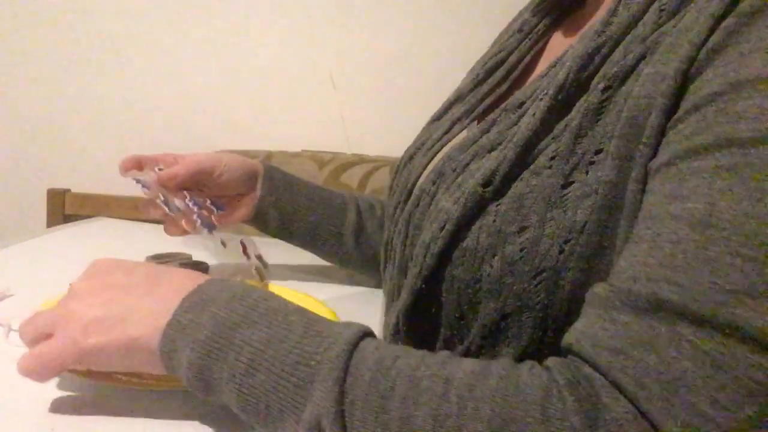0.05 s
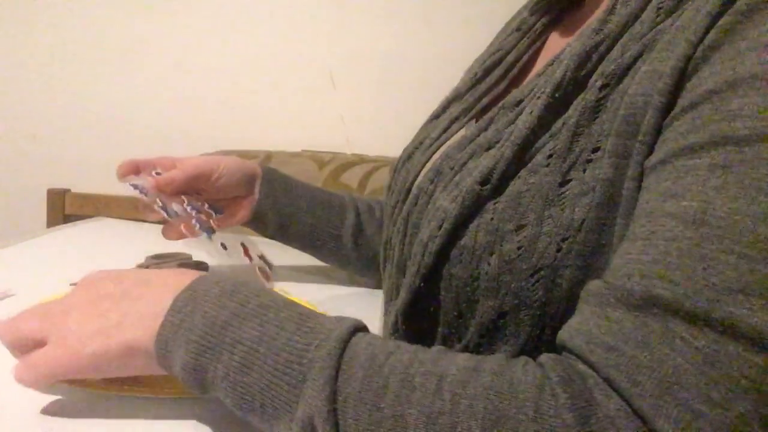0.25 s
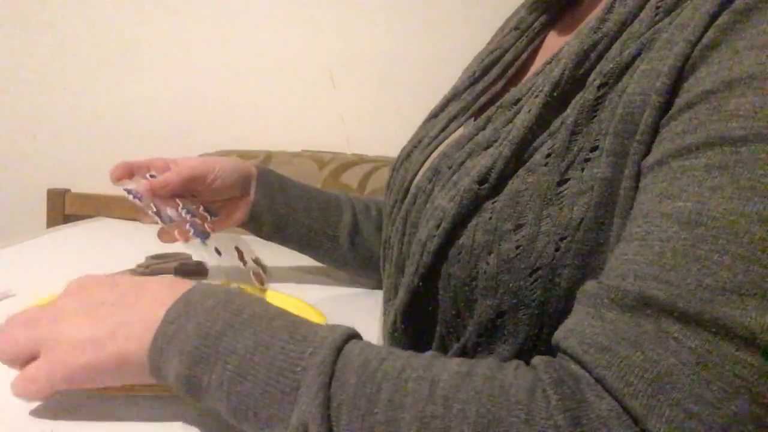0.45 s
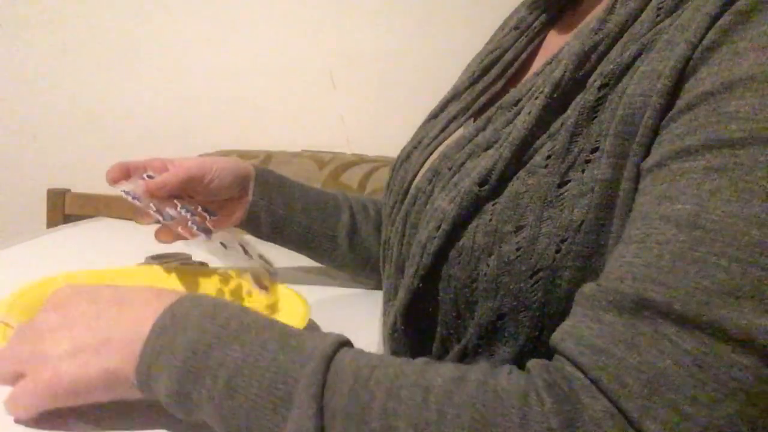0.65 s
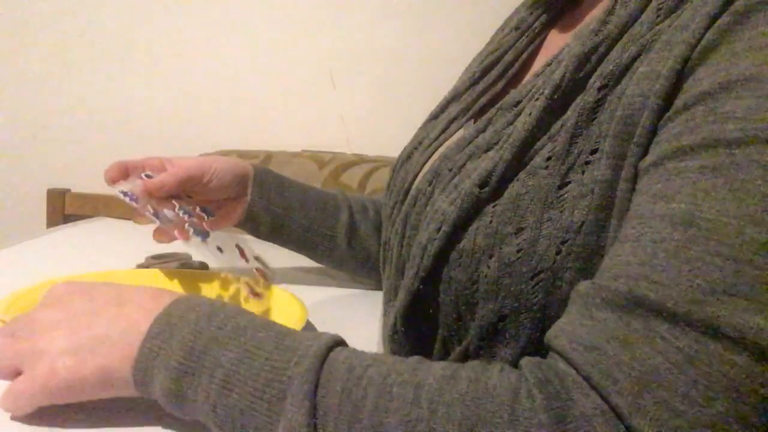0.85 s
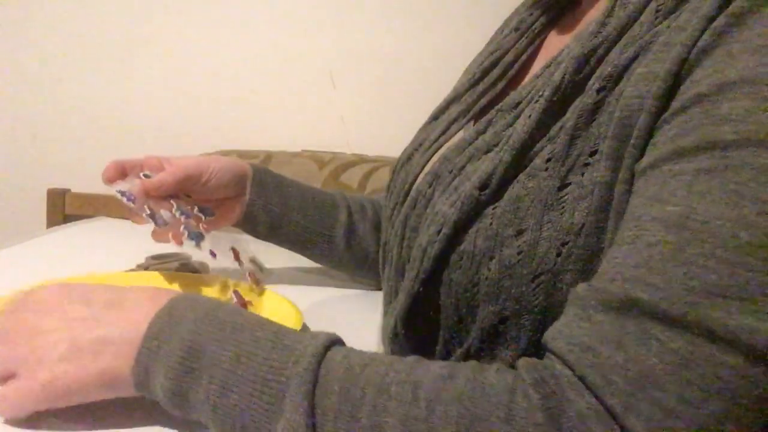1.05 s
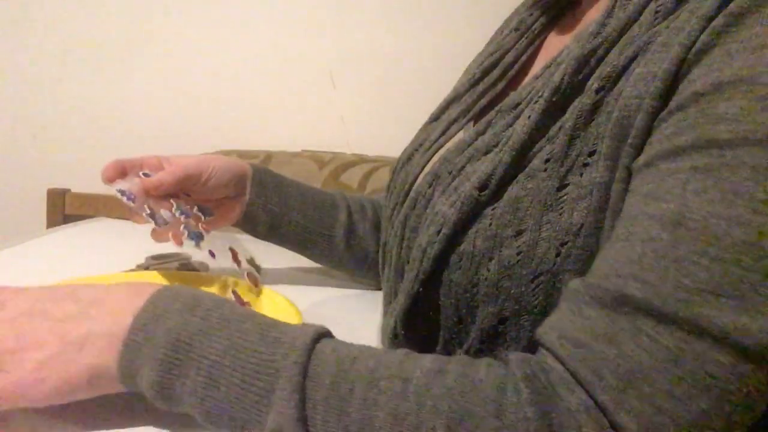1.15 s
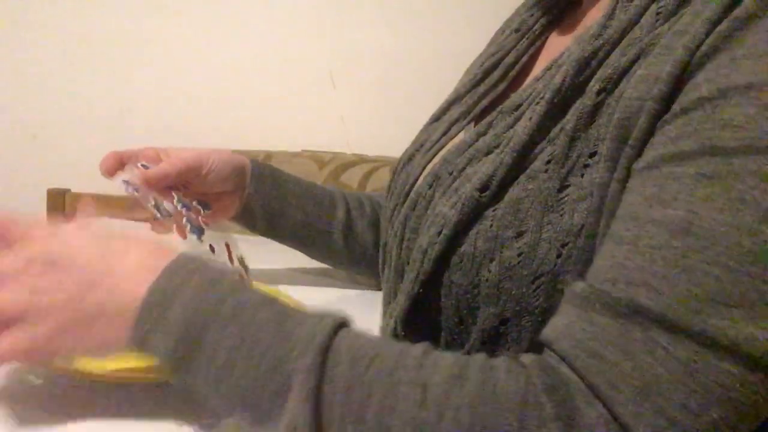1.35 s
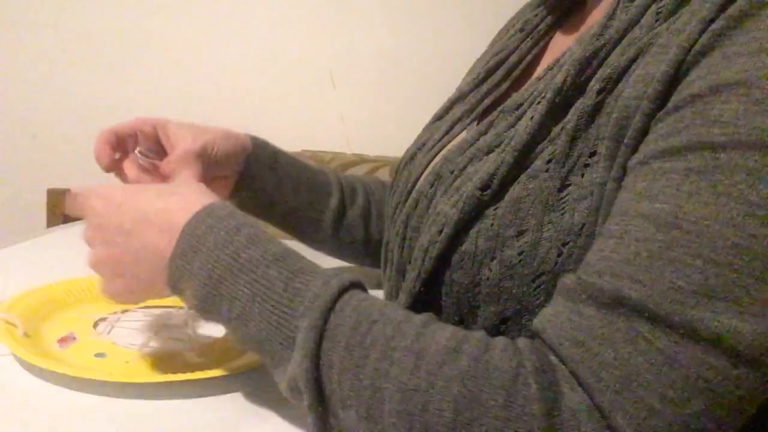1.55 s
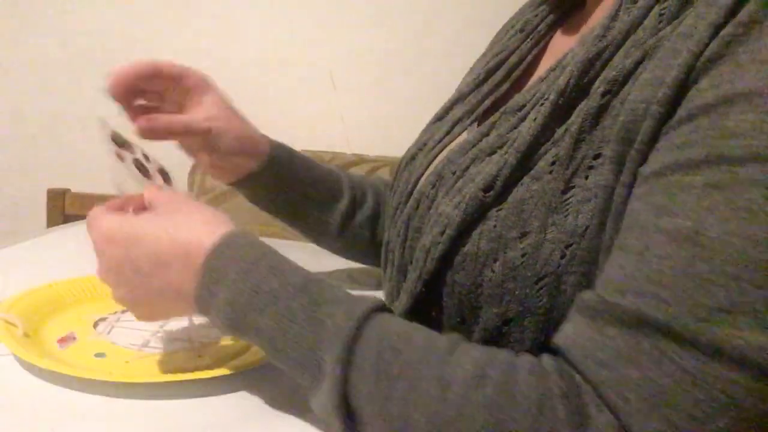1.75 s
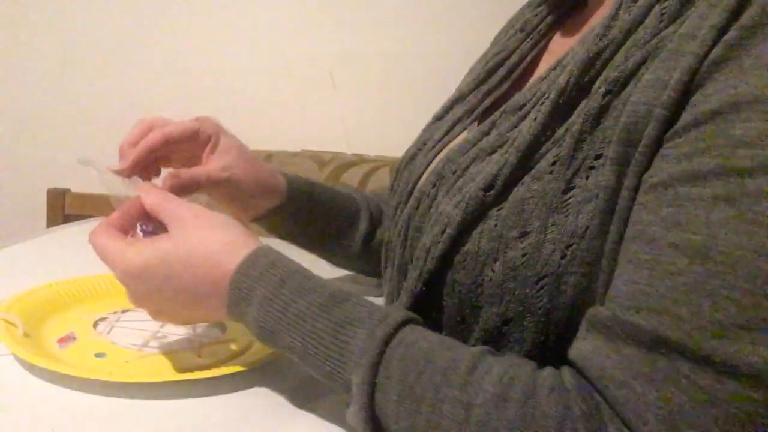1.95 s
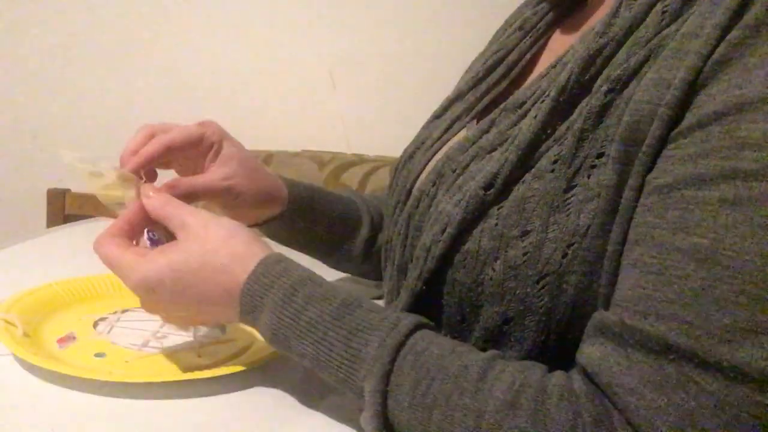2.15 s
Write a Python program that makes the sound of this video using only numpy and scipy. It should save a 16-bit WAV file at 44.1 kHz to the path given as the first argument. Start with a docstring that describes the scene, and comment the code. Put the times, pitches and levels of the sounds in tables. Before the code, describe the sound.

Thin plastic sticker sheet crackles and ticks in the hands, snapping once midway, in a quiet room

```python
"""Dry ticks and a soft bump come first, as a sticker is peeled off a stiff plastic sheet in a small, quiet room.
Coloured jolts with short rings make the ticks and one sharp snap; decaying sine modes make the pops.
Random slips make the glue's hiss and the rustle of the sheet as it is bent, turned over and gripped again.
Low noise bursts make the thuds and a narrow noise band a high ping; echoes, a noise tail and room tone surround it all."""
import sys
import numpy as np
from scipy import signal
from scipy.fft import rfft, irfft
from scipy.io import wavfile
from scipy.ndimage import uniform_filter1d, map_coordinates

SR = 44100
rng = np.random.default_rng(int(sys.argv[2]) if len(sys.argv) > 2 else 0)


def persist_wave(psi):
    """Save psi, clipped to +-1, as 16-bit WAV."""
    counts = np.round(np.clip(psi, -1, 1) * 32767).astype(np.int16)
    wavfile.write(sys.argv[1], SR, np.atleast_2d(counts).T)


N = 96579  # length (samples)

# The sticker comes free; tonal balance of the snap: (frequency [Hz], relative level [dB])
SNAP_COLOUR = [(40, -52), (90, -7.5), (200, -5), (450, -5), (1250, -11.5), (2600, 0), (3700, 1.5),
               (4800, -1.5), (5900, 5), (8000, -1.5), (10500, -9), (12000, -3), (16000, -16)]
# What the snap throws at the walls: (frequency [Hz], relative level [dB])
SNAP_ECHO_COLOUR = [(25, -29), (60, -25), (120, -11), (500, -16.5), (1200, -16.5), (2200, -9.5),
                    (3000, -6.5), (4200, -4), (6200, 1), (8500, -1), (10500, -1), (12300, -2.5),
                    (16000, -12.5)]
# Bright echoes of the snap off nearby surfaces: (delay after the snap [s], level [dB])
SNAP_GLINTS = [(0.0119, -31), (0.018, -43), (.0254, -30)]
SNAP_S, SNAP_DB, SNAP_T60, SNAP_RING_DB, SNAP_ROOM_DB = 1.0325, -16, 0.0072, -2, -22
SNAP_LAG_S = 0.00012  # the snap starts near the sheet's edge, so it is hardly smeared

# Buckles of the sheet: (time [s], flex level [dB], crack level [dB], edge level [dB], flex pitch [Hz])
BUCKLES = [(0.0098, -48.5, -47, -48, 1310), (0.0594, -59, -53.5, -47, 1000),
           (0.1442, -47.5, -64, -49, 1360), (0.1858, -44.5, -48, -54, 1790), (0.2001, -46, -73, -67, 1450),
           (0.2353, -57, -51, -71, 1360), (0.2887, -48, -55.5, -56, 1160),
           (0.3869, -54, -51.5, -52, 1960.0), (0.5925, -47, -50, -45.5, 1690),
           (0.621, -32.5, -34, -38.5, 1830), (0.7928, -52, -69, -57.5, 1820),
           (0.8399, -37.5, -62, -57, 1650), (0.8443, -48.5, -65, -58, 1840),
           (1.0301, -37.5, -45, -52, 2030), (1.123, -47, -67, -58, 1050), (1.32, -51, -51.5, -51, 1100),
           (1.357, -37.5, -49, -72, 1830), (1.3768, -49.5, -56.5, -62, 1460.0),
           (1.6066, -45.5, -59, -81, 1600), (1.632, -64, -50.5, -49.5, 2250),
           (1.6427, -47.5, -51, -51, 1430), (1.6617, -52, -49, -47, 1280),
           (1.6674, -47, -44, -40.5, 2030.0), (1.6769, -43, -38.5, -46, 1840), (1.697, -42, -41, -53, 2260),
           (1.7019, -34, -41, -40, 2060), (1.7089, -37, -33, -32.5, 1600), (1.7261, -37.5, -48, -62, 1100),
           (1.782, -42, -60, -75, 1410), (1.8351, -40, -52, -74, 2230), (1.845, -43, -47.5, -78, 2170),
           (1.8655, -73, -58, -43.5, 2300), (1.912, -47, -55, -53.5, 1820),
           (1.936, -49, -54.5, -53.5, 1510), (1.9955, -56, -50, -51.5, 1750), (2.007, -44, -66, -67, 1780),
           (2.0207, -39.5, -60, -75, 1580), (2.056, -63, -52, -58, 1800.0),
           (2.0629, -50, -45.5, -51, 2220.0), (2.1311, -42, -55, -54, 1370),
           (2.1525, -49, -44.5, -43.5, 1770)]
# Hollow flex of a buckle: (multiple of its pitch [ratio], relative level [dB])
FLEX_COLOUR = [(.08, -28), (.25, -20.5), (.5, -8), (.75, -8), (1, -2.5), (1.25, -5.5), (1.9, -17.5),
               (4.4, -50)]
# Crack of a buckle: (frequency before scatter [Hz], relative level [dB])
CRACK_COLOUR = [(800, -58.5), (2400, -5.5), (3600, 2.5), (4700, -1), (6000, -2.5), (8000, -8.5),
                (14000, -45)]
# Fine edge of a buckle: (frequency before scatter [Hz], relative level [dB])
EDGE_COLOUR = [(3000, -40), (6000, -1.5), (8000, -3), (10500, -8), (12000, -9), (16000, -15)]
FLEX_T60, CRACK_T60, EDGE_T60 = 0.015, 0.099, 0.0054  # ring of the sheet (s)
FLEX_RING_DB, CRACK_RING_DB, EDGE_RING_DB = 2, -10, -15.5  # ring against the first jolt
COLOUR_SCATTER = 0.073  # spread of crack and edge pitch between buckles (log ratio)
STUTTER_S, STUTTER_DB = 0.0007, -2.5  # mean gap between slips; level step per slip

# Dents in the sheet pop through and ring: (time [s], level [dB], pitch [Hz])
POPS = [(.27, -45, 2090), (.838, -40.5, 1916), (1.075, -40, 2200), (1.3565, -41.5, 2167),
        (1.6925, -36, 1900), (1.8352, -38.5, 2110), (1.8445, -50, 2000), (1.974, -50, 1950),
        (2.0157, -37.5, 1940), (2.0337, -35, 2100), (2.083, -49, 1870), (2.109, -51, 1800),
        (2.1531, -43, 1880)]
# Modes of a popping dent: (multiple of its pitch [ratio], relative level [dB])
POP_MODES = [(0.999, 0), (1.632, -14), (2.72, -31)]
POP_RISE_S = 0.00098  # time to peak of a mode at the pop's pitch

# The sheet is turned and gripped: (time [s], level [dB])
HANDLING_LEVEL = [(0, -56.5), (.035, -62.5), (.14, -100), (.2, -58.5), (.245, -96), (.276, -53),
                  (.31, -77.5), (.58, -70), (.6, -56.5), (.68, -90), (.79, -94), (.8, -60), (.83, -69.5),
                  (.847, -58), (.87, -78), (1.11, -67.5), (1.13, -54), (1.18, -74), (1.59, -77),
                  (1.655, -54.5), (1.702, -42), (1.72, -50.5), (1.78, -56.5), (1.825, -90), (1.92, -65.5),
                  (1.998, -69), (2.013, -47.5), (2.05, -59.5), (2.12, -61.5), (2.19, -67.5)]
# Rustle of the slack sheet: (frequency [Hz], relative level [dB])
RUSTLE_COLOUR = [(100, -11.5), (500, -6), (800, -2.5), (1200, 0.5), (1950, -0.5), (2800, -9.5),
                 (5000, -14.5), (9400, -19), (16000, -35.5)]
RUSTLE_PER_S, RUSTLE_SPREAD_DB = 2200, 2.5
TAUT_PITCH, SLACK_PITCH = 1.28, 1  # rustle pitch while the sheet is bent and let go (ratio)
CLUMPS_PER_S, CLUMP_DB = 170, 3  # the fingers catch and slip, so the rustle comes in clumps

# The whole sheet knocks against the fingers: (time [s], level [dB], pitch [Hz])
KNOCKS = [(.234, -49.5, 504), (0.6233, -44, 640), (.845, -43, 990), (1.035, -42, 800), (1.136, -46.5, 630),
          (1.14, -48, 980), (2.017, -43.5, 946), (2.055, -47, 422)]
# Tonal balance of a knock: (multiple of its pitch [ratio], relative level [dB])
KNOCK_COLOUR = [(.2, -19), (.7, -14), (1, -0.5), (1.35, -12.5), (3, -28.5)]
KNOCK_T60 = 0.028  # ring of a knock (s)

# Peeling glue: (time [s], level [dB])
PEEL_LEVEL = [(0, -98), (.13, -71), (.16, -69), (.29, -64), (.345, -73.5), (.43, -71.5), (.51, -61),
              (.56, -65), (.63, -62.5), (.70, -78), (.718, -70.5), (.735, -59.5), (.76, -63.5),
              (.78, -70.5), (.845, -66), (.88, -74.5), (1.265, -76.5), (1.283, -66), (1.32, -73.5),
              (1.6, -74.5)]
# Hiss of the glue: (frequency [Hz], relative level [dB])
GLUE_COLOUR = [(500, -2.5), (1500, -13), (4100, -2.5), (4900, -8.5), (6400, -0.5), (9500, -5), (12500, -9),
               (16000, -18.5)]
GLUE_PER_S, GLUE_SPREAD_DB = 7600, 0  # the breaks are all of one size

# A thin, high ping
PING_S, PING_HZ, PING_WIDTH_HZ, PING_DB, PING_T60 = 1.865, 9150, 900, -53, 0.11

# Soft bumps of hands and sheet: (time [s], level [dB], decay T60 [s], pitch [Hz])
BUMPS = [(.002, -48, 0.045, 101), (0.051, -51.5, 0.066, 134), (0.878, -51, 0.058, 158),
         (.912, -50.5, 0.082, 157), (1.034, -48, 0.14, 120), (1.124, -48, 0.18, 165),
         (1.39, -52, 0.061, 125)]
# Tonal balance of a bump: (multiple of its pitch [ratio], relative level [dB])
BUMP_COLOUR = [(.2, -30), (.6, -1.5), (1, 2), (1.5, -4), (2.4, -16), (7, -14), (20, -38.5)]
BUMP_ATTACK_S = 0.0026

# First echoes from table and walls: (delay [s], level [dB])
WALLS = [(.0042, -23.5), (.0092, -22.5)]
# Decay of the room: (frequency [Hz], decay T60 [s])
ROOM_DECAY = [(150, 0.46), (1000, 0.34), (3000, 0.31), (7000, 0.3), (15000, 0.21)]
# Tint of the sheet's sound in the room's tail: (frequency [Hz], gain [dB])
ROOM_COLOUR = [(200, -1), (1000, 2.5), (2200, -1.5), (4000, 1), (9000, -3), (15000, 5)]
ROOM_DB, ROOM_ONSET_S = -10.5, 0.0087

# Steady room tone: (frequency [Hz], relative level [dB])
AIR_COLOUR = [(34, -27.5), (48, 5), (70, -4.5), (120, 1.5), (200, -6), (280, -6), (640, -10), (1300, -14.5),
              (3000, -17.5), (5500, -28), (10000, -35), (13000, -25), (16000, -53)]
AIR_DB = -68.5

TOP_HZ = 16100  # upper band limit
BEND_LAG_S = 0.000912  # bending waves: travel time at 1 kHz, counted before the head start in bent()


def snap():
    """The sticker comes free and the bent sheet springs back: a broad jolt and a very short ring."""
    out = np.zeros(N)
    add(out, SNAP_S, amp(SNAP_DB) * click(SNAP_COLOUR, SNAP_T60, SNAP_RING_DB, lag_s=SNAP_LAG_S))
    return out


def snap_echo():
    """The snap comes back brighter from the room: a few glints and a diffuse tail."""
    thrown, glints = np.zeros(N), np.zeros(N)
    add(thrown, SNAP_S, jolt(SNAP_ECHO_COLOUR))
    for delay, db in SNAP_GLINTS:
        add(glints, SNAP_S + delay, amp(db) * click(SNAP_ECHO_COLOUR, t60=0.0037, ring_db=0))
    return glints + amp(SNAP_ROOM_DB) * reverb(thrown)


def buckles():
    """Each buckle mixes a hollow flex at its own pitch, a crack and a fine edge."""
    out = np.zeros(N)
    shifts = np.exp(COLOUR_SCATTER * rng.standard_normal((len(BUCKLES), 2)))
    for (s, flex_db, crack_db, edge_db, hz), (crack_shift, edge_shift) in zip(BUCKLES, shifts):
        flex = click(FLEX_COLOUR, FLEX_T60, FLEX_RING_DB, hz)
        crack = stutter(click(CRACK_COLOUR, CRACK_T60, CRACK_RING_DB, crack_shift))
        edge = stutter(click(EDGE_COLOUR, EDGE_T60, EDGE_RING_DB, edge_shift))
        add(out, s, amp(flex_db) * flex + amp(crack_db) * crack + amp(edge_db) * edge)
    return out


def pops():
    """A dent flips through and rings briefly in a few modes; the higher ones die sooner."""
    out, t = np.zeros(N), np.arange(SR // 20) / SR
    phases = rng.uniform(0, 2 * np.pi, (len(POPS), len(POP_MODES)))
    for (s, db, hz), row in zip(POPS, phases):
        for (multiple, mode_db), phase in zip(POP_MODES, row):
            age = t * np.sqrt(multiple) / POP_RISE_S
            swell = age * np.exp(1 - age)  # peaks at 1
            tone = np.sin(2 * np.pi * multiple * hz * t + phase)
            add(out, s, amp(db + mode_db) * swell * tone)
    return out


def handling():
    """Fingers bend the sheet in uneven clumps; it rings higher as the effort grows, lower as it slackens."""
    knots = rng.standard_normal(2048)
    clumps = map_coordinates(knots, [np.arange(N) * CLUMPS_PER_S / SR], mode="wrap")
    grip = amp(CLUMP_DB * clumps)
    effort = level(HANDLING_LEVEL)
    growing = 1. * (np.gradient(effort) > 0)
    tension = np.clip(uniform_filter1d(growing, size=SR // 50), 0, 1)
    taut, slack = [crackle(np.array(RUSTLE_COLOUR) * [pitch, 1], RUSTLE_PER_S, RUSTLE_SPREAD_DB)
                   for pitch in (TAUT_PITCH, SLACK_PITCH)]
    rustle = np.sqrt(tension) * taut + np.sqrt(1 - tension) * slack  # equal-power blend
    return effort * unit(bent(grip * rustle, BEND_LAG_S))


def knocks():
    """Low, hollow knocks of fingertips on the sheet: a jolt and a short ring at each pitch."""
    out = np.zeros(N)
    for s, db, hz in KNOCKS:
        add(out, s, amp(db) * click(KNOCK_COLOUR, KNOCK_T60, ring_db=1.5, pitch=hz))
    return out


def peeling():
    """Threads of glue break in a fine hiss of dense, equal clicks."""
    return level(PEEL_LEVEL) * crackle(GLUE_COLOUR, GLUE_PER_S, GLUE_SPREAD_DB)


def ping():
    """A thin, high ring after a flick of the sheet's edge: decaying noise in a narrow band."""
    out, t = np.zeros(N), np.arange(SR // 4) / SR
    edges = [PING_HZ - PING_WIDTH_HZ / 2, PING_HZ + PING_WIDTH_HZ / 2]
    band = signal.butter(2, edges, "band", fs=SR, output="sos")
    ring = unit(signal.sosfilt(band, rng.standard_normal(len(t))))
    add(out, PING_S, amp(PING_DB - 60 * t / PING_T60) * ring)
    return out


def bumps():
    """Dull thuds of the hands and the flopping sheet: low noise with a soft attack."""
    out, t = np.zeros(N), np.arange(SR // 4) / SR
    for s, db, t60, hz in BUMPS:
        shape = (1 - np.exp(-t / BUMP_ATTACK_S)) * amp(-60 * t / t60)
        thud = coloured(rng.standard_normal(len(t)) * shape, np.array(BUMP_COLOUR) * [hz, 1])
        add(out, s, amp(db) * unit(thud) * np.sqrt(np.mean(shape ** 2)))
    return out


def walls(x):
    """The direct sound with first echoes from table and walls."""
    out = x.copy()
    for delay, db in WALLS:
        add(out, delay, amp(db) * x)
    return out


def reverb(x):
    """The diffuse tail of the room: noise that swells in and dies at its own rate in each band."""
    hz, t, z = signal.stft(rng.standard_normal(SR // 2), SR, nperseg=256)
    decay = amp(-60 * t / along(ROOM_DECAY, hz)[:, None])
    tail = signal.istft(z * decay, SR, nperseg=256)[1]
    tail = tail * (1 - np.exp(-(np.arange(len(tail)) / SR / ROOM_ONSET_S) ** 2))
    return signal.fftconvolve(x, tail / np.linalg.norm(tail))[:N]


def room_tone():
    """The steady air of the room: coloured noise."""
    return amp(AIR_DB) * unit(coloured(rng.standard_normal(N), AIR_COLOUR))


def click(colour, t60, ring_db, pitch=1, lag_s=BEND_LAG_S, size=2048):
    """A jolt and the sheet's brief, dense ring, smeared by the travel of bending waves."""
    t = np.arange(size) / SR
    colour = np.array(colour) * [pitch, 1]
    shape = amp(-60 * t / t60) * (1 - np.exp(-t / 0.0011))  # rise time in s
    ring = coloured(rng.standard_normal(size) * shape, colour)
    return burst(bent(jolt(colour) + amp(ring_db) * burst(ring), lag_s))


def jolt(colour, size=2048):
    """One coloured impulse."""
    return burst(coloured(1. * (np.arange(size) == 0), colour))


def stutter(x, count=3):
    """A crack gives way in a few quick, uneven slips, each weaker than the last."""
    gaps = STUTTER_S * rng.uniform(.5, 1.5, count - 1)
    starts = np.round(np.r_[0, np.cumsum(gaps)] * SR).astype(int)
    return burst(sum(amp(STUTTER_DB * k) * np.pad(x, (i, 0))[:len(x)] for k, i in enumerate(starts)))


def crackle(colour, per_s, spread_db):
    """A steady stream of tiny slips at random times, their sizes scattered by spread_db."""
    slips = (rng.random(N) < per_s / SR) * rng.choice([-1, 1], N)
    sizes = amp(spread_db * np.minimum(rng.exponential(size=N), 4))
    return unit(coloured(slips * sizes, colour))


def bent(x, lag_s):
    """Bending waves carry x through the sheet: the treble arrives first."""
    hz = np.fft.rfftfreq(2 * len(x), 1 / SR)
    # delay falls with the root of frequency; the second term takes it to zero at TOP_HZ
    cycles = lag_s * (2 * np.sqrt(1000 * hz) - hz * np.sqrt(1000 / TOP_HZ))
    return irfft(rfft(x, 2 * len(x)) * np.exp(-2j * np.pi * cycles))[:len(x)]


def coloured(x, points, size=4096):
    """Pass x through a causal, minimum-phase filter with the given colour."""
    cep = irfft(np.log(amp(along(points, np.fft.rfftfreq(size, 1 / SR)))))
    # fold the cepstrum forward in time
    cep[1:size // 2] *= 2
    cep[size // 2 + 1:] = 0
    return signal.fftconvolve(x, irfft(np.exp(rfft(cep))))[:len(x)]


def along(points, hz):
    """Read (Hz, value) points on a log frequency axis."""
    f, v = np.transpose(points)
    return np.interp(np.log(hz + 1), np.log(f + 1), v)


def level(points):
    """Gain per sample from (s, dB) points."""
    return amp(np.interp(np.arange(N) / SR, *np.transpose(points)))


def amp(db):
    """Decibels to gain."""
    return 10 ** (np.asarray(db) / 20)


def unit(x):
    """Scale to rms 1."""
    return x / np.sqrt(np.mean(x ** 2) + 1e-20)


def burst(x):
    """Scale x to the energy of one millisecond at rms 1."""
    return x / np.linalg.norm(x) * np.sqrt(SR / 1000)


def add(track, s, x):
    """Mix x into the track at time s."""
    i = max(0, round(s * SR))
    track[i:i + len(x)] += x[:max(0, N - i)]


def scene():
    """Sheet and hands in the room, over its steady tone."""
    sheet = buckles() + pops() + knocks() + peeling() + handling()
    echo = amp(ROOM_DB) * reverb(coloured(sheet, ROOM_COLOUR)) + snap_echo()
    mix = walls(sheet + snap()) + ping() + echo + bumps() + room_tone()
    return mix[None]  # one channel


def record(dry):
    """A steep low-pass rolls the treble off around the recorder's band limit."""
    taps = signal.firwin(161, TOP_HZ, fs=SR, window=("kaiser", 8))
    return signal.fftconvolve(dry, taps[None], mode="same", axes=1)


dry = scene()
out = record(dry)
persist_wave(out)
```